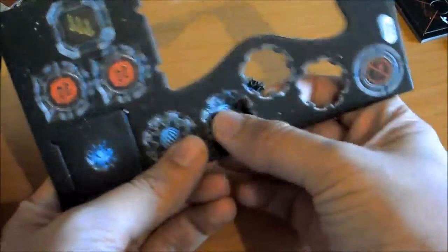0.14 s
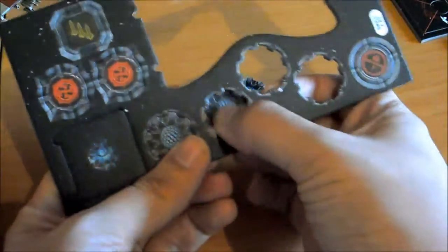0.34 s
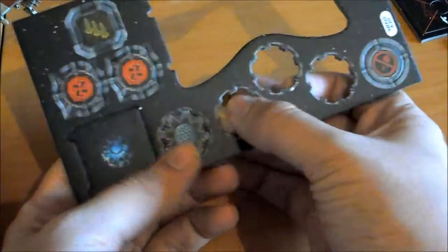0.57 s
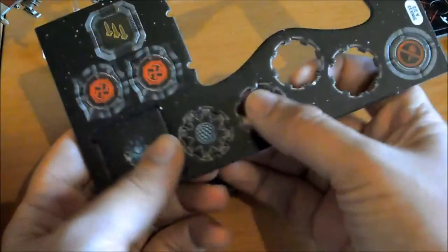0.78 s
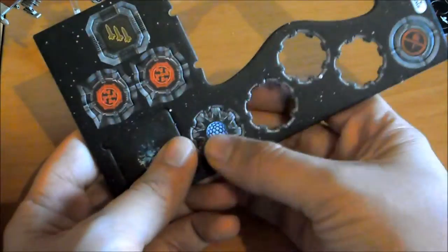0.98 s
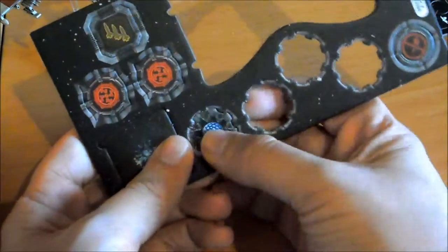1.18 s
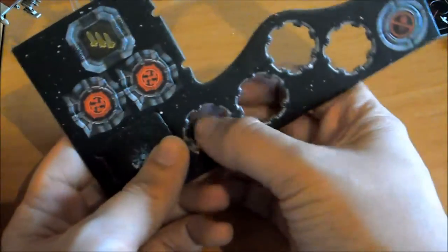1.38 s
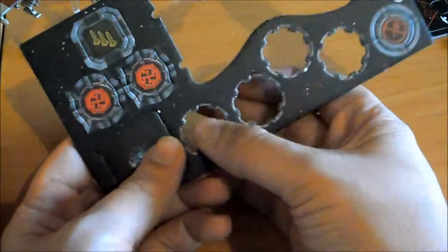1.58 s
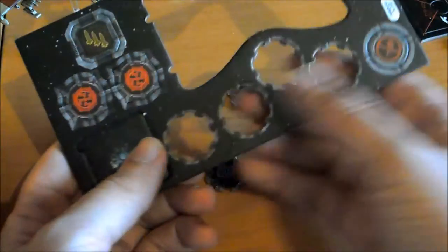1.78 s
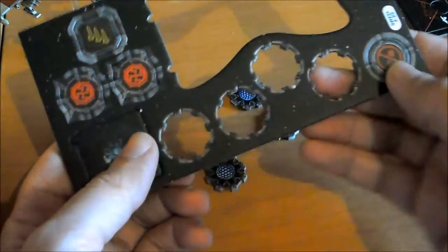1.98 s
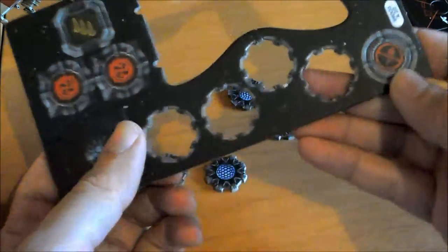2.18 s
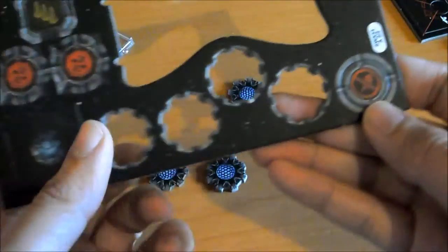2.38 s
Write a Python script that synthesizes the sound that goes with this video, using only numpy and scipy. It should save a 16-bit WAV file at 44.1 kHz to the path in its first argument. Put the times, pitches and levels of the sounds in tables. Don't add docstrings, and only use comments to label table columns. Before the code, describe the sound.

Cardboard tokens are pressed from a stiff die-cut board: a short crackling tear, a light rattling landing on wood, then a second sharper snap and a hard slap on the table, close in a small room with faint hiss.

```python
import sys
import numpy as np
from scipy import signal
from scipy.fft import rfft, irfft
from scipy.io import wavfile
from scipy.ndimage import uniform_filter1d

SR = 44100
rng = np.random.default_rng(int(sys.argv[2]) if len(sys.argv) > 2 else 0)


def volts_from_decibels(level):
    exponent = np.asarray(level, float) / 20
    return 10 ** exponent


def master(y):
    cut = np.clip(np.atleast_2d(y).T, -1, 1)
    pcm = np.round(cut * 32767)
    wavfile.write(sys.argv[1], SR, pcm.astype(np.int16))


N = 107559


def tear_tabs():
    # start_s, peak_db, burst_s, treble_db
    first_tears = [
        (.1143, -34, 0.0058, 2),
        (.1202, -20.5, 0.003, -12.5),
        (.1252, -20, 0.0048, -2.5),
        (.1297, -43, 0.0028, -1.5),
        (.2352, -40, 0.00076, -3),
    ]
    second_tears = [
        (1.111, -42.5, .004, -21),
        (1.1593, -31.5, 0.013, -9.5),
        (1.177, -29.5, 0.0026, -11),
        (1.1802, -17.5, 0.0012, -7.5),
        (1.1962, -20.5, 0.0066, -8.5),
    ]
    # pitch_hz, level_db, t60_s
    first_board = [(250, -16, .05), (880, -7, .04), (1330, -9, .03), (1590, 0, .035), (1840, -11, .03),
                   (2500, -18, .02), (3750, -6, .03), (4300, -8, .03), (5200, -10, .02)]
    second_board = [(425, -9, .04), (860, 0, .03), (1050, -5, .025), (1300, -.5, .03), (1590, -9, .03),
                    (2500, -5, .025), (2770, -9, .02), (3750, -8, .02), (4380, -7, .025), (5250, -12, .02)]
    # pitch_hz, level_db, t60_s
    bright_modes = [(6250, 6.5, 0.014), (8320, 5.5, 0.027), (7880, 4, 0.025), (9700, 11, 0.004)]
    # low_hz, high_hz, t60_s, level_db
    board_fibre = (800, 4800, 0.003, -7.0)
    bright_fibre = (5500, 10500, 0.004, 1.5)
    out = np.zeros((2, N))
    for tears, board_modes in ((first_tears, first_board), (second_tears, second_board)):
        for start_s, peak_db, burst_s, treble_db in tears:
            body = ring(board_modes, board_fibre)
            body = body + volts_from_decibels(treble_db) * ring(bright_modes, bright_fibre)
            tear = signal.fftconvolve(crack_burst(burst_s), body)
            place(out, start_s, peak_db, tear, body)
    return radiate(out, 179)


def land_tokens():
    # start_s, peak_db, chatter_s, treble_db, treble_hz
    first_landings = [(0.5352, -21.5, 0.0094, -24.5, 8700), (0.5533, -23, 0.0055, -15, 9100),
                      (0.6386, -28.5, 0.005, -3, 9700), (0.6419, -22.5, 0.002, -10, 10260),
                      (0.647, -26, 0.0026, -7, 9700), (.694, -38, 0.0081, -11, 8540),
                      (0.717, -33.5, 0.0037, -6, 10040), (.7217, -32.5, 0.0039, -10, 9700),
                      (0.7279, -34.5, 0.0053, -9, 9700), (.778, -40, .004, -15, 9200),
                      (.782, -38, 0.007, -18, 9150), (.819, -38.5, 0.0064, -13, 9160)]
    second_landings = [
        (1.4743, -25, .009, -16, 7500),
        (1.4867, -11.5, .0075, 2.5, 7400),
        (1.6235, -30.5, .009, -3, 6000),
        (1.7017, -28.5, .0075, 1.5, 7600),
    ]
    # pitch_hz, level_db, t60_s
    table_modes = [(307, -3, 0.038), (705, -5, 0.12), (890, -23, 0.09), (1228, 7, 0.059),
                   (1656, 6.5, 0.054), (1780, 8.5, 0.014), (2290, 5, 0.043), (2603, 4.5, 0.076),
                   (2860, -3, 0.026), (3084, 11, 0.02), (3540, -6.5, 0.021), (3690, 5.5, 0.034),
                   (4200, 1, 0.017), (5000, -5, 0.046)]
    table_fibre = (700, 5000, 0.003, -1.0)  # low_hz, high_hz, t60_s, level_db
    first_token = (0.02, 0.035, 0.02, 277)
    second_token = (0.002, 0.2, 0.0012, 895)
    out = np.zeros((2, N))
    for landings, token in ((first_landings, first_token), (second_landings, second_token)):
        rim_t60_s, spread, drive_s, bass_cut_hz = token
        for start_s, peak_db, chatter_s, treble_db, treble_hz in landings:
            rim_modes = [(treble_hz * (1 + k * spread), 0, rim_t60_s) for k in (-1, 0, 1)]
            rim_fibre = ((1 - 2 * spread) * treble_hz, (1 + 2 * spread) * treble_hz, rim_t60_s, 0)
            rim = volts_from_decibels(treble_db) * ring(rim_modes, rim_fibre)
            body = radiate(ring(table_modes, table_fibre), bass_cut_hz)
            chatter = crack_burst(chatter_s)
            rim_drive = chatter * np.exp(-np.arange(len(chatter)) / SR / drive_s)
            landing = signal.fftconvolve(chatter, body) + signal.fftconvolve(rim_drive, rim)
            place(out, start_s, peak_db, landing, body + 0.52 * rim)
    return out


def crack_burst(length_s):
    cracks_per_s, crack_db, scatter_db, fade_db = 4500, -10, 3.5, -3.5
    chance, luck, side = rng.random((3, 1024))
    t = np.arange(1024) / SR
    level_db = crack_db - scatter_db * np.log(luck + 0.1) + fade_db * t / length_s
    size = volts_from_decibels(level_db) * np.sign(side - 0.5)
    stop = np.clip((length_s - t) / 0.001, 0, 1)
    cracks = size * (chance < cracks_per_s / SR) * stop
    cracks[0] = -volts_from_decibels(4.0)
    return cracks


def ring(modes, fibre):
    detune, scatter_db, t60_scale = 0.008, 1.5, 0.5
    t = np.arange(4096) / SR
    hz, db, t60_s = np.array(modes, float).T
    pitch_draw, level_draw, sign_draw = rng.standard_normal((3, len(hz)))
    tones = np.sin(2 * np.pi * hz * (1 + detune * pitch_draw) * t[:, None])
    tones = tones * volts_from_decibels(-60 * t[:, None] / (t60_scale * t60_s))
    clear = tones @ (volts_from_decibels(db + scatter_db * level_draw) * np.where(sign_draw > -0.4, 1, -1))
    low_hz, high_hz, fibre_t60_s, fibre_db = fibre
    rattle = rng.standard_normal(len(t)) * volts_from_decibels(-60 * t / fibre_t60_s)
    dense = signal.lfilter(*signal.butter(3, [low_hz, high_hz], "band", fs=SR), rattle)
    return clear / np.linalg.norm(clear) + volts_from_decibels(fibre_db) * dense / np.linalg.norm(dense)


def radiate(x, bass_cut_hz):
    return signal.lfilter(*signal.butter(2, bass_cut_hz, "high", fs=SR), x)


def place(out, start_s, peak_db, sound, click):
    i = int(start_s * SR)
    gain = volts_from_decibels(peak_db) / np.max(np.abs(sound))
    out[0, i:i + len(sound)] += gain * sound
    out[1, i:i + len(click)] += gain * click * np.linalg.norm(sound) / np.linalg.norm(click)


def slide_fingers():
    # time_s, level_db
    slide_moves = [(0.5, -68), (.9, -65), (1.1, -57.5), (1.22, -60.5), (1.34, -55), (1.42, -53),
                   (1.46, -59), (1.55, -60.5), (1.78, -56.5), (1.84, -71)]
    # pitch_hz, level_db per Hz
    slide_colour = [(200, -12.5), (450, -4), (800, -8.5), (1300, -14), (2500, -18.5), (4600, -20.5),
                    (9000, -26)]
    time_s, db = np.array(slide_moves, float).T
    level_db = np.interp(np.arange(N) / SR, time_s, db) + 2.0 * wander(20)
    return volts_from_decibels(level_db) * coloured_noise(slide_colour)


def room(x):
    # pitch_hz, level_db, t60_s
    room_bands = [(278, -7, 0.59), (706, -2.5, 0.16), (1570, -4, 0.2), (2860, 2, 0.23), (5670, 5.5, 0.13),
                  (10800, 9.5, 0.14)]
    t = np.arange(SR // 3) / SR
    tail = np.zeros(len(t))
    for hz, db, t60_s in room_bands:
        edges_hz = [hz / 1.6, min(hz * 1.6, 20000)]
        band_filter = signal.butter(2, edges_hz, "band", fs=SR, output="sos")
        band = signal.sosfilt(band_filter, rng.standard_normal(len(t)))
        tail += volts_from_decibels(db - 60 * t / t60_s) * band / np.sqrt(hz)
    tail *= np.clip(t / 0.005, 0, 1) ** 2
    return signal.fftconvolve(x, tail / np.sqrt(np.sum(tail ** 2)))[:N]


def camera():
    # pitch_hz, level_db per Hz
    hiss_colour = [(12, -53), (20, 0), (184, -3.5), (252, -8.5), (416, -6.5), (806, -8.5), (872, -9.5),
                   (9640, -18), (11000, -20.5), (14300, -70), (22000, -120)]
    hiss_db, frame_hz, first_frame_s = -57, 30.02, 0.0007
    tick_db, tick_scatter_db, tick_width_s, tick_bass_cut_hz = -52.5, 2.0, 0.0008, 30
    frames_s = np.arange(first_frame_s, N / SR, 1 / frame_hz)
    pulses = np.zeros(N)
    pulses[(frames_s * SR).astype(int)] = volts_from_decibels(tick_db + tick_scatter_db * rng.standard_normal(len(frames_s)))
    t = np.arange(-220, 221) / SR
    ticks = np.convolve(pulses, np.exp(-0.5 * (t / tick_width_s) ** 2), "same")
    ticks = signal.lfilter(*signal.butter(1, tick_bass_cut_hz, "high", fs=SR), ticks)
    return ticks + volts_from_decibels(hiss_db) * coloured_noise(hiss_colour)


def coloured_noise(points):
    hz, db = np.array(points, float).T
    f = np.maximum(np.arange(N // 2 + 1) * SR / N, 1)
    spectrum = rfft(rng.standard_normal(N)) * volts_from_decibels(np.interp(np.log(f), np.log(hz), db))
    x = irfft(spectrum, N)
    return x / np.std(x)


def wander(rate_hz):
    k = int(SR / rate_hz)
    x = uniform_filter1d(uniform_filter1d(rng.standard_normal(N), k), k)
    return x / np.std(x)


def scene():
    floor = camera() + slide_fingers()
    board, board_send = tear_tabs()
    table, table_send = land_tokens()
    wet = room(volts_from_decibels(-12.5) * board_send + volts_from_decibels(-7) * table_send)
    return np.tile(floor + board + table + wet, (2, 1))


def roll_off(x):
    return signal.sosfilt(signal.butter(12, 11510, fs=SR, output="sos"), x)


def record(dry):
    band_limit = signal.cheby2(12, 62, 10880 + 850, fs=SR, output="sos")
    mix = signal.sosfilt(band_limit, dry)
    return roll_off(mix)


dry = scene()
out = record(dry)
master(out)
```